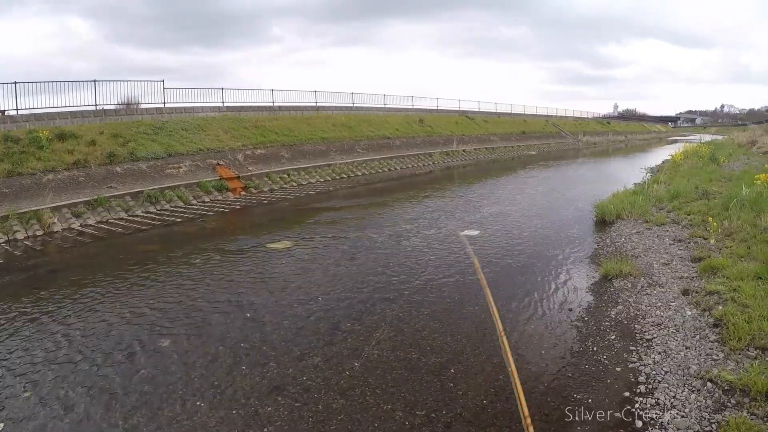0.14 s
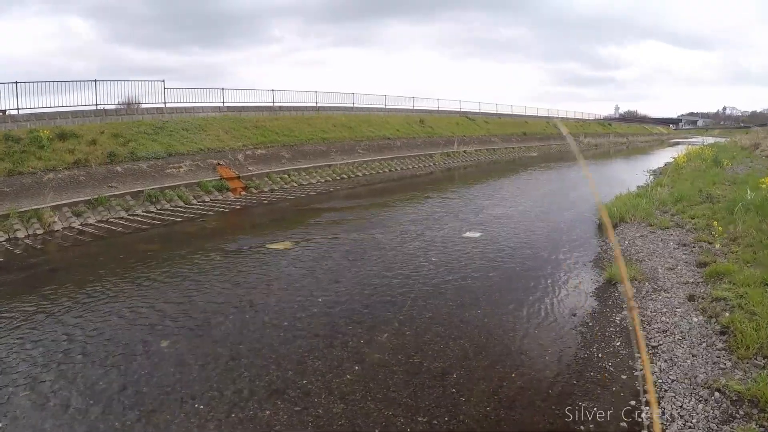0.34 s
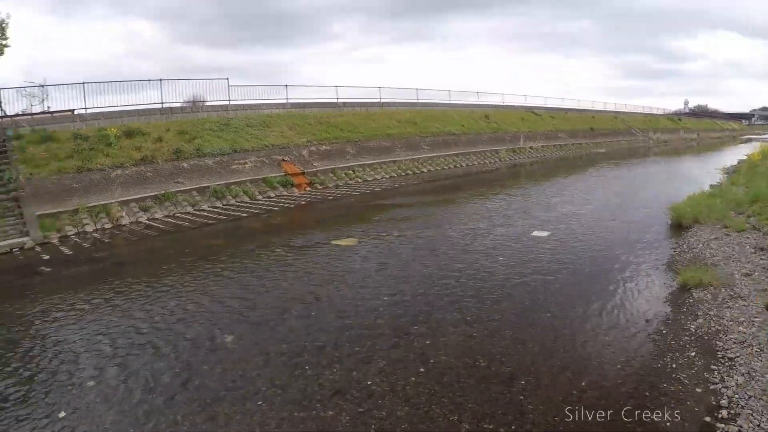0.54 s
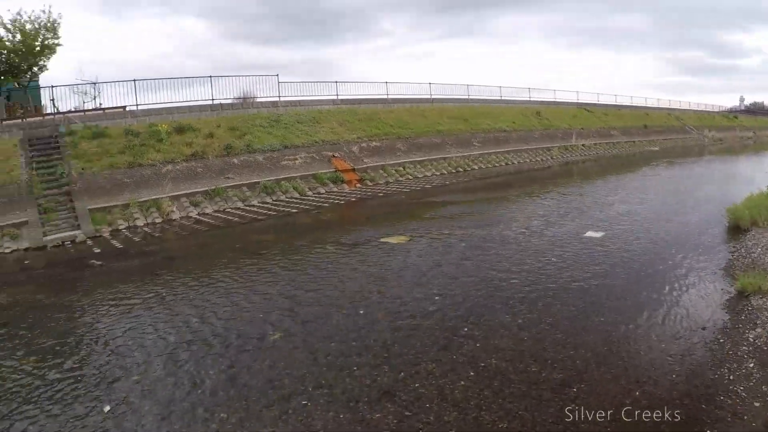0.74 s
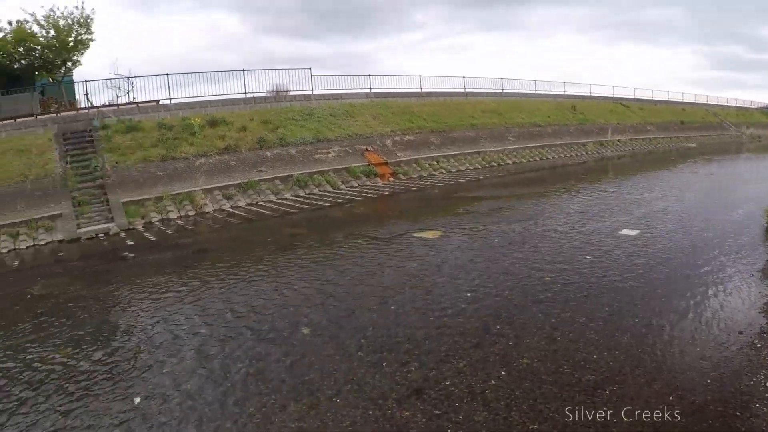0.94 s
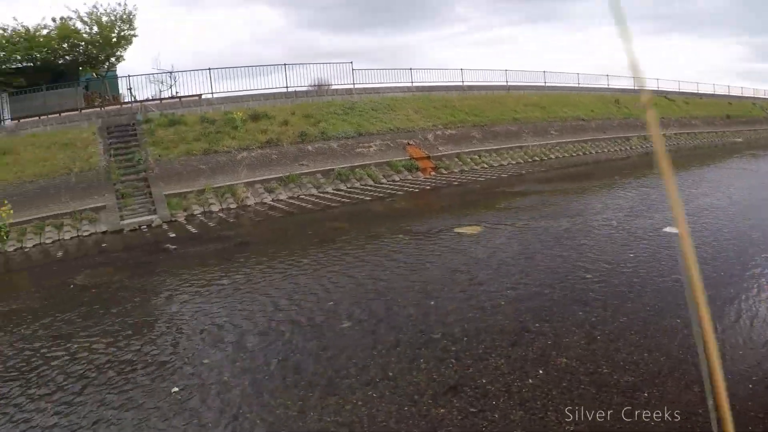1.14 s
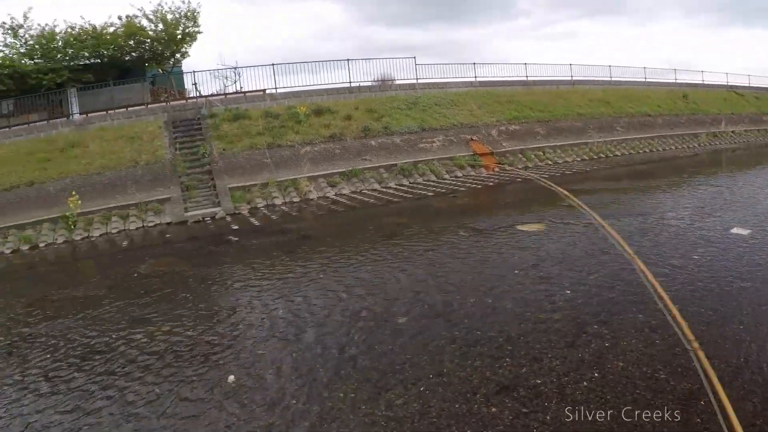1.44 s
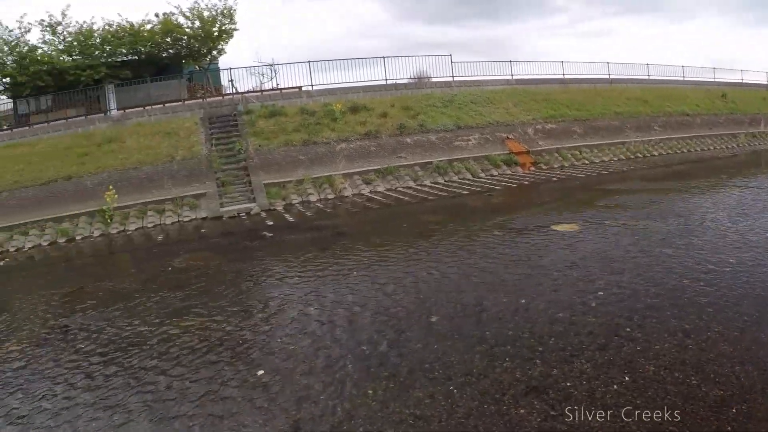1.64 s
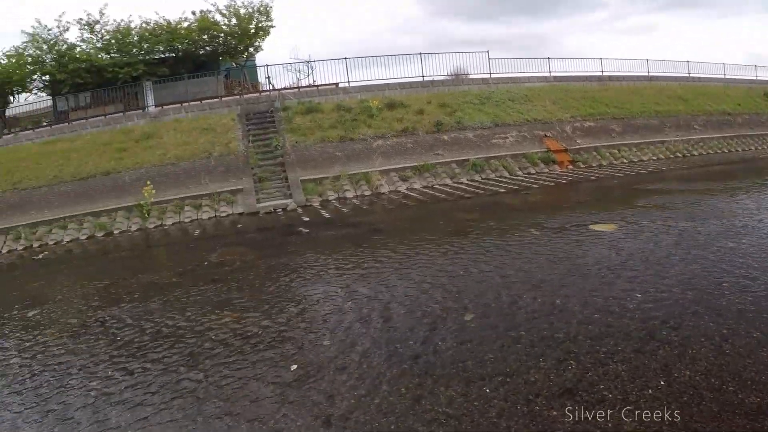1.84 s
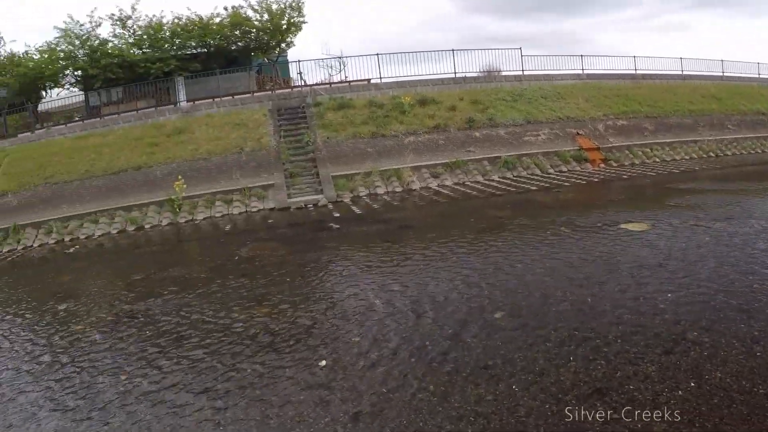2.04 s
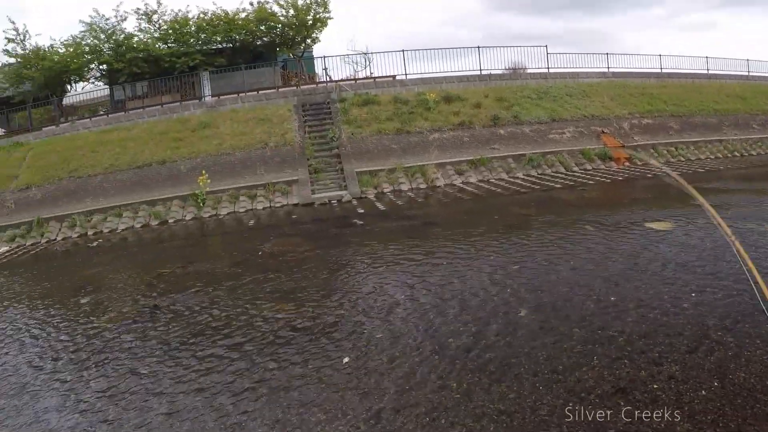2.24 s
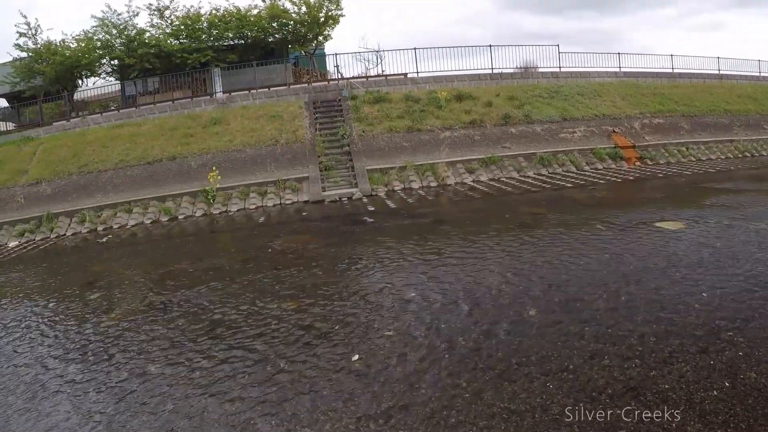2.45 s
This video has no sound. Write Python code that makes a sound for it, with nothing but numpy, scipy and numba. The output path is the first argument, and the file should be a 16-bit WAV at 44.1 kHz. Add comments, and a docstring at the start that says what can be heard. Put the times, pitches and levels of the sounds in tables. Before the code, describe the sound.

Outdoors at a river, a fishing line lifts with a thin hiss, small knocks and a few drops, then whips past twice, over faint water rush and low wind buffeting the close stereo microphones.

```python
"""A fly rod is swung beside a shallow river, close to a small camera with two microphone ports.
Throughout, the river rushes evenly as noise in flickering bands, while wind buffets each port on its own
as steadied noise and a low wavering tone rocks the housing. From 0.2 s the line hisses as it lifts and
swishes in swelling noise bands; soon the rod grip ticks as short decaying sines. From 0.6 s a few drops
glide up in pitch and puffs of wind thump one port; near 2.2 s the speeding line whistles upward, and
near 2.38 s a slow, soft swell of low-mid noise comes and goes."""
import sys
import numpy as np
from scipy import signal
from scipy.fft import rfft, irfft
from scipy.io import wavfile
from scipy.ndimage import uniform_filter1d
from numba import njit

SR = 44100
rng = np.random.default_rng(int(sys.argv[2]) if len(sys.argv) > 2 else 0)


def master(y):
    """Save y as 16-bit WAV."""
    cut = np.clip(np.atleast_2d(y).T, -1, 1)
    pcm = np.round(cut * 32767)  # scale
    wavfile.write(sys.argv[1], SR, pcm.astype(np.int16))


def invert_db(level):
    """Linear amplitude ratio for a level in decibels (20 dB per decade), elementwise."""
    return 10 ** (np.asarray(level, dtype=float) / 20)


N = 114660  # samples, 2.6 s


def col(table, k, t):
    """Column k of a table, interpolated over time."""
    a = np.array(table, float)
    return np.interp(t, a[:, 0], a[:, k])


def unit(x):
    """Scale to rms 1."""
    return x / np.sqrt(np.mean(x ** 2))


def over_hz(table):
    """A (pitch_hz, level_db) table as gain per FFT bin, interpolated over log frequency."""
    a = np.array(table, float)
    f = np.maximum(np.fft.rfftfreq(N, 1 / SR), 1)
    return invert_db(np.interp(np.log(f), np.log(np.maximum(a[:, 0], 1)), a[:, 1]))


def shape(x, gain):
    """Filter by a gain per FFT bin."""
    return irfft(rfft(x) * gain, N)


def walk(rate):
    """Random levels held 1 / rate seconds and smoothed twice; mean 0, spread 1."""
    hold = int(SR / rate)
    w = np.repeat(rng.standard_normal(N // hold + 1), hold)
    w = uniform_filter1d(uniform_filter1d(w, hold), hold)[:N]
    return (w - w.mean()) / w.std()


@njit
def svf(x, hz, width):
    """State-variable band-pass with a moving centre, gain 1 at the centre."""
    y, b, l = np.empty(len(x)), 0., 0.
    for i in range(len(x)):
        g, k = np.tan(np.pi * hz[i] / SR), width / hz[i]
        v = (b + g * (x[i] - l)) / (1 + g * (g + k))
        b, l, y[i] = 2 * v - b, l + 2 * g * v, k * v
    return y


def band(hz, width_hz):
    """Steep band of noise, rms 1, about width_hz wide at its -6 dB points."""
    centre_hz = np.clip(hz + np.zeros(N), 10, SR / 3)
    x = rng.standard_normal(N)
    for _ in range(3):
        x = svf(x, centre_hz, 1.4 * width_hz)  # each pass narrows the band
    return unit(x)


def bump(t, peak, rise, fall):
    """Swell that builds gradually to 1 and falls away; about half height at rise and fall from the peak."""
    return 1 / np.cosh(1.21 * (t - peak) / np.where(t < peak, rise, fall))


def pan(pair, db):
    """Tilt a left-right pair by db, left over right."""
    return pair * invert_db(np.array([db, -db]).reshape(len(pair), -1) / 2)


STEADY = 0.89  # 0 leaves plain noise, 1 divides out its whole envelope


def steady(x, span_s):
    """Evens out the level of a noise over span_s: wind is steadier than plain noise."""
    k = int(span_s * SR)
    power = uniform_filter1d(uniform_filter1d(x ** 2, k), k) + 1e-9
    return unit(x / power ** (STEADY / 2))


# colour of the river rush as both ports sum it, before the low cut: pitch_hz, level_db (per Hz, relative)
RIVER_COLOUR = [(88, -31), (150, -1.5), (455, -18), (560, -13), (800, -17.5), (1150, -18.5), (1700, -19.5),
                (2000, -23), (2400, -26), (4300, -31.5), (6500, -32.5), (10300, -32.5), (12500, -42),
                (14500, -46.5)]
RIVER_DB = -53  # rms


def river():
    """Rush of small splashes: rough noise in half-octave bands, each flickering alone on a slow shared swell."""
    f = np.fft.rfftfreq(N, 1 / SR)
    low_cut = f ** 2 / (f ** 2 + 160.0 ** 2)
    rough = rng.standard_normal(N) * invert_db(1.05 * walk(900))
    rush = shape(rough, over_hz(RIVER_COLOUR) * low_cut)
    swell, out = walk(3.4), 0
    for centre_hz in 88 * 2 ** np.arange(0, 8, .5):
        octaves = np.log2(np.maximum(f, 1) / centre_hz)
        part = shape(rush, np.clip(1 - np.abs(2 * octaves), 0, 1))  # overlapping triangles
        out = out + part * invert_db(0.15 * swell + 0.74 * walk(20))
    return unit(out) * invert_db(RIVER_DB)


# rocking of the housing, same at both ports, hardest at the stop of the rod: time_s, level_db (rms)
ROCKING = [(0.0, -54), (0.26, -67), (0.3, -41), (0.36, -35), (0.47, -54), (0.7, -38.5), (0.75, -42),
           (0.8, -33.5), (0.95, -46.5), (0.99, -37), (1.29, -39.5), (1.35, -21.5), (1.45, -30.5),
           (1.52, -42), (1.55, -40.5), (1.67, -41.5), (1.69, -39), (1.95, -38.5), (2.17, -44), (2.2, -41.5),
           (2.37, -40.5), (2.4, -46), (2.45, -50), (2.6, -47)]
ROCKING_HZ, ROCKING_WAVER = 28.5, 0.2036  # middle pitch; largest pitch swing as a log ratio


def rocking(t):
    """The housing rocks as a low sine that wavers in pitch and level, less when it rocks hard."""
    level_db = col(ROCKING, 1, t)
    calm = np.clip((-24 - level_db) / 14, .1, 1)
    hz = ROCKING_HZ * np.exp(ROCKING_WAVER * calm * np.tanh(walk(13)))
    phase = 2 * np.pi * np.cumsum(hz) / SR
    return np.sqrt(2) * np.sin(phase) * invert_db(level_db + 2.1 * calm * np.tanh(walk(22.46)))


# low wind across both ports: time_s, level_db (of the shared part, before tilt), tilt_db (left over right)
LOW_WIND = [(0.0, -63, 6.0), (0.11, -66, 3), (0.3, -52, 24), (0.35, -52, 8), (0.62, -44.5, 12),
            (0.65, -43, -3), (0.73, -41.5, 5), (0.76, -39.5, 15), (0.8, -45, 3), (1.5, -42.5, -1),
            (1.53, -45.5, 18), (1.85, -44, 11.5), (2.02, -37, 3), (2.06, -47, 6), (2.44, -45, 0.5),
            (2.49, -45, 8.5), (2.6, -54.5, 15)]
LOW_WIND_HZ, LOW_WIND_WIDTH_HZ = 66, 75
LOW_WIND_SHARED, LOW_WIND_STEADY_S = 0.74, 0.087  # correlation of the ports; span of the steadying


def low_wind(t):
    """Low wind as steadied noise, part common to the ports and part opposed, with a wavering level."""
    mid, side = (steady(band(LOW_WIND_HZ, LOW_WIND_WIDTH_HZ), LOW_WIND_STEADY_S) for _ in range(2))
    side_gain = np.sqrt((1 - LOW_WIND_SHARED) / (1 + LOW_WIND_SHARED))
    pair = mid + side_gain * side * np.array([[1], [-1]])
    level_db = col(LOW_WIND, 1, t) + 3.5 * np.tanh(walk(14))
    return pan(pair * invert_db(level_db), col(LOW_WIND, 2, t))


# buffeting at the left port: time_s, level_db (of the body, before the waver)
BUFFET_LEFT = [(0, -41), (.06, -50.5), (.19, -50), (.222, -29), (.26, -33), (.29, -28), (.33, -34.5),
               (.42, -35), (.46, -33), (.55, -34), (.578, -22), (.604, -24.5), (.615, -46), (.70, -30),
               (.726, -34), (.742, -24), (.765, -27), (.782, -35), (.83, -34), (.86, -46.5), (.9, -56),
               (1.2, -46), (1.48, -50), (1.52, -40.5), (1.58, -52.5), (1.65, -40.5), (1.68, -39),
               (1.705, -37), (1.73, -44), (1.79, -42.5), (1.86, -55), (2.0, -53.5), (2.22, -50),
               (2.54, -43.5), (2.6, -56)]
# buffeting at the right port: time_s, level_db (of the body, before the waver)
BUFFET_RIGHT = [(0, -53), (.18, -48.5), (.27, -43), (.55, -46), (.59, -37), (.625, -65), (0.648, -29),
                (.665, -40), (0.685, -33), (.715, -37), (.76, -34.5), (.83, -57), (.868, -36.5), (.9, -57),
                (1.0, -50), (1.25, -46), (1.31, -49), (1.41, -45), (1.6, -47), (2.1, -51.5), (2.345, -49),
                (2.385, -42.5), (2.44, -48), (2.6, -47)]
# colour of the body of the buffeting: pitch_hz, level_db (per Hz, relative)
BUFFET_COLOUR = [(60, -15), (100, -13.5), (140, 4), (200, 0.5), (300, -6.5), (450, -14), (800, -34),
                 (1500, -42), (4000, -90)]
BUFFET_STEADY_S = 0.02
BUFFET_TOP_HZ, BUFFET_TOP_WIDTH_HZ = 577, 550
BUFFET_TOP_DB, BUFFET_TOP_SLOPE = -63.5, 0.82  # level at a buffeting of -42.5 dB; dB per dB of buffeting
BUFFET_OPPOSED = 0.1  # share that reaches the other port inverted


def buffeting(t):
    """Wind buffets each port with its own steadied noise, plus an upper band that follows its level."""
    ports = []
    for table in (BUFFET_LEFT, BUFFET_RIGHT):
        level_db = col(table, 1, t) + 1.83 * np.tanh(walk(34.89))
        body = steady(shape(rng.standard_normal(N), over_hz(BUFFET_COLOUR)), BUFFET_STEADY_S)
        top_db = BUFFET_TOP_DB + BUFFET_TOP_SLOPE * (level_db + 42.5) + 1.5 * np.tanh(walk(80))
        top = band(BUFFET_TOP_HZ, BUFFET_TOP_WIDTH_HZ) * invert_db(top_db)
        ports.append(body * invert_db(level_db) + top)
    return np.array(ports) - BUFFET_OPPOSED * np.array(ports[::-1])


# hiss of the lifting line: time_s, level_db, centre_hz
LIFT = [(.17, -79, 7350), (.24, -65, 6840), (.4, -63, 6100), (.6, -63, 6130), (.8, -66, 6440),
        (.9, -72, 6300)]
LIFT_WIDTH_HZ = 2900
SPRAY_HZ, SPRAY_WIDTH_HZ, SPRAY_DB = 2550, 3700, -1  # spray under the hiss; level relative to the hiss


def lift(t):
    """The line hisses as it lifts, a moving noise band with a broader, lower band of spray."""
    level_db = col(LIFT, 1, t)
    hiss = band(col(LIFT, 2, t), LIFT_WIDTH_HZ) * invert_db(level_db + 1.7 * walk(25.6))
    spray = band(SPRAY_HZ, SPRAY_WIDTH_HZ) * invert_db(level_db + SPRAY_DB + 1.8 * walk(59.8))
    return hiss + spray


# ticks of the grip, loudest at the right port: start_s, level_db, pitch_hz,
# tilt_db (left over right, on top of the weaker left share)
TICKS = [(.268, -27, 440, -11), (.292, -37, 1450, -16.5), (.471, -29.5, 1270, -8.5),
         (0.482, -37.5, 1430, -18), (0.675, -38.5, 1620, -10), (0.707, -34, 930, -14),
         (.755, -33.5, 1380, -10), (1.399, -33, 1560, -8), (1.409, -35, 1750, -13)]
TICK_T60_S, TICK_ATTACK_S = 0.011, 0.00062
TICK_OVERTONE, TICK_OVERTONE_DB = 1.336, -4.5  # pitch ratio; level relative to the main tone
TICK_OPPOSED = 0.4  # inverted share at the left port


def ticks(t):
    """Short knocks that the housing carries: two decaying sines, opposed at the two ports."""
    out = np.zeros((2, N))
    for start_s, level_db, hz, tilt_db in TICKS:
        age = np.maximum(t - start_s, 0)
        ring = np.sin(2 * np.pi * hz * age)
        ring = ring + invert_db(TICK_OVERTONE_DB) * np.sin(2 * np.pi * TICK_OVERTONE * hz * age)
        ring = ring * np.exp(-np.log(1000) * age / TICK_T60_S) * (1 - np.exp(-age / TICK_ATTACK_S))
        out = out + pan(invert_db(level_db) * ring * np.array([[-TICK_OPPOSED], [1]]), tilt_db)
    return out * invert_db(2.5 * np.tanh(walk(400)))  # roughens the level


# swishes of the passing line, and one slow, soft swell of low-mid noise near 2.38 s:
# peak_s, level_db (before flutter), centre_hz, width_hz, rise_s, fall_s
SWISHES_AND_SWELL = [(.297, -60.5, 2980, 4000, .006, 0.022), (0.639, -56.5, 3700, 2500, 0.0024, 0.0047),
                     (.82, -60.5, 3270, 3000, 0.015, 0.018), (1.29, -57, 4000, 1600, 0.011, 0.0047),
                     (1.303, -53.5, 3500, 900, 0.0066, .005), (1.305, -60, 6800, 2000, 0.022, 0.014),
                     (1.33, -61, 5770, 1500, 0.022, 0.026), (1.37, -59.5, 1730, 1500, 0.06, 0.043),
                     (2.195, -54.5, 6130, 4760, 0.055, 0.03), (2.217, -47.5, 6640, 4370, 0.0017, 0.005),
                     (2.225, -52, 3440, 5070, 0.021, 0.024), (2.234, -47.5, 6300, 3500, 0.0015, 0.0015),
                     (2.385, -57.5, 7840, 2200, 0.022, 0.015), (2.38, -60.5, 630, 400, .12, 0.072),
                     (2.595, -59.5, 3530, 1200, 0.0099, .01)]


def swishes_and_swell(t, flutter):
    """Swishes of the passing line and one soft low-mid swell: noise bands that rise, fall and flutter together."""
    out = 0
    for peak_s, level_db, hz, width_hz, rise_s, fall_s in SWISHES_AND_SWELL:
        out = out + invert_db(level_db) * bump(t, peak_s, rise_s, fall_s) * band(hz, width_hz) * flutter
    return out


# drops falling from the line: start_s, level_db (before fade and tilt), start_pitch_hz
DROPS = [(.636, -49.5, 2380), (.646, -47, 1500), (.678, -46, 1750), (2.458, -45, 534)]
DROP_T60_S, DROP_ATTACK_S = 0.06, 0.0013
DROP_GLIDE_PER_S = 23.6  # rise of pitch per second, in multiples of the start pitch


def drops(t):
    """Broken bubbles, sines that glide up as they fade, stronger at the right port."""
    out = 0
    for start_s, level_db, hz in DROPS:
        age = np.clip(t - start_s, 0, .1)
        fade = np.exp(-np.log(1000) * age / DROP_T60_S) * (1 - np.exp(-age / DROP_ATTACK_S))
        tone = np.sin(2 * np.pi * hz * (age + DROP_GLIDE_PER_S * age ** 2 / 2))
        out = out + invert_db(level_db) * fade * tone
    out = out * invert_db(5.0 * np.tanh(walk(500)))  # roughens the level
    return pan(out * np.ones((2, 1)), -6)


# sudden puffs of wind, each mostly on one port: start_s, level_db (before fade and tilt),
# start_pitch_hz, tilt_db (left over right)
PUFFS = [(.64, -25.5, 220, -16), (.671, -22, 290, -15.5), (.734, -17, 244, 15), (.76, -18, 200, 14),
         (1.701, -26, 236, 11.5)]
PUFF_CYCLES, PUFF_SAG = 9.4, 0.203  # start-pitch cycles to fade 60 dB; pitch is start / (1 + sag * cycles)


def puffs(t):
    """Abrupt low thumps, sines that sag in pitch and die in a few cycles."""
    out = np.zeros((2, N))
    for start_s, level_db, hz, tilt_db in PUFFS:
        cycles = np.clip(t - start_s, 0, .1) * hz
        tone = -np.sin(2 * np.pi * np.log1p(PUFF_SAG * cycles) / PUFF_SAG)
        fade = np.exp(-np.log(1000) * cycles / PUFF_CYCLES) * (1 - np.exp(-cycles / 0.31))
        out = out + pan(tone * fade * np.ones((2, 1)), tilt_db) * invert_db(level_db)
    return out


# whistle of the line as it speeds up: peak_s, level_db, centre_hz (at the peak), climb_hz_per_s,
# width_hz, rise_s, fall_s
WHISTLE = (2.185, -59, 6900, 28000, 500, 0.025, 0.01)


def whistle(t):
    """The speeding line whistles: a narrow noise band that climbs in pitch as it swells and falls."""
    peak_s, level_db, hz, climb, width_hz, rise_s, fall_s = WHISTLE
    return invert_db(level_db) * bump(t, peak_s, rise_s, fall_s) * band(hz + climb * (t - peak_s), width_hz)


def line(t, flutter):
    """The lift, the swishes with the soft swell, and the whistle, summed."""
    return lift(t) + swishes_and_swell(t, flutter) + whistle(t)


# side over mid of the port pair for sound from the air: pitch_hz, level_db
PORT_SIDE = [(200, -21), (370, 5), (680, 6), (1250, 5.5), (2300, 0), (3300, -2), (4300, -4.5), (5300, 1),
             (7000, 3), (8500, 0), (11000, 0), (14300, 0.5)]
# left over right of the port pair for sound from the air: pitch_hz, level_db
PORT_BALANCE = [(300, 3.5), (680, 0), (1250, -2), (2300, 0), (4230, -1), (7770, -3.5), (14300, -1)]


def through_ports(mid, side):
    """Sound from the air at the two ports: mid plus and minus a coloured side, tilted by frequency."""
    side = shape(side, over_hz(PORT_SIDE))
    tilt = np.sqrt(over_hz(PORT_BALANCE))
    return np.array([shape(mid + side, tilt), shape(mid - side, 1 / tilt)])


FLUTTER_PER_S, FLUTTER_DB = 140, 3.5
LINE_SIDE_DB = 1.5  # the line sounds wider and more diffuse across the ports than the river


def scene():
    """Sound from the air through the port pair, plus drops, housing knocks and wind at the ports."""
    t = np.arange(N) / SR
    flutter = invert_db(FLUTTER_DB * np.tanh(walk(FLUTTER_PER_S)))
    mid = river() + line(t, flutter)
    side = river() + invert_db(LINE_SIDE_DB) * line(t, flutter)  # fresh noise, same flutter
    wind = rocking(t) + low_wind(t) + buffeting(t)
    return through_ports(mid, side) + wind + ticks(t) + drops(t) + puffs(t)


def roll_off(x):
    """The treble ends steeply here."""
    return signal.sosfilt(signal.butter(12, 14870, fs=SR, output="sos"), x)


def record(dry):
    """The camera cuts the extremes: steeply above 14.8 kHz, gently below 18 Hz."""
    y = signal.sosfilt(signal.ellip(8, .2, 70, 14800, fs=SR, output="sos"), dry)
    y = signal.sosfilt(signal.butter(2, 18, "high", fs=SR, output="sos"), y)
    return roll_off(y)


dry = scene()
out = record(dry)
master(out)
```